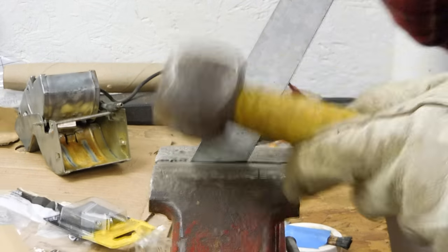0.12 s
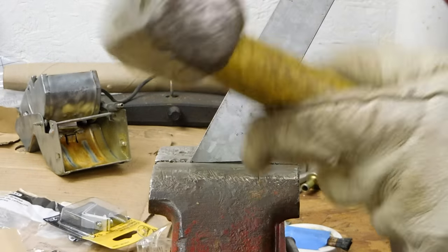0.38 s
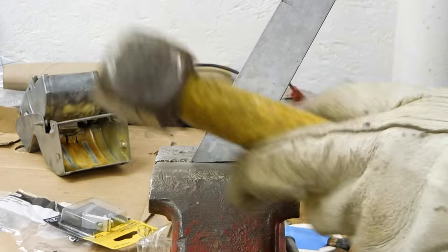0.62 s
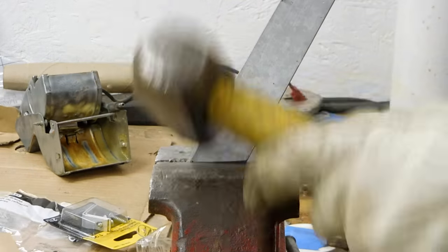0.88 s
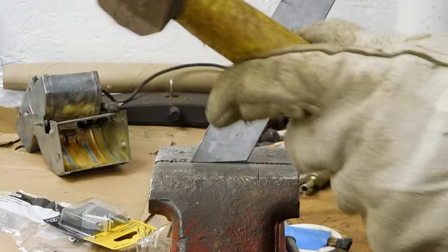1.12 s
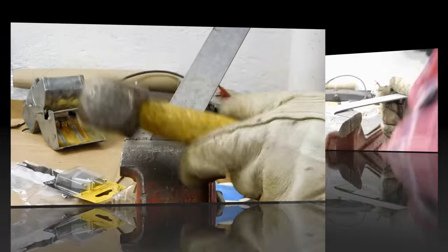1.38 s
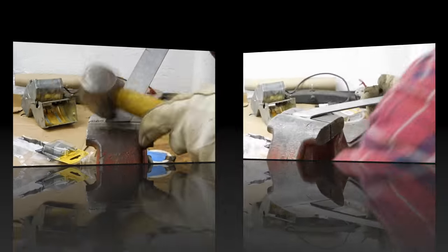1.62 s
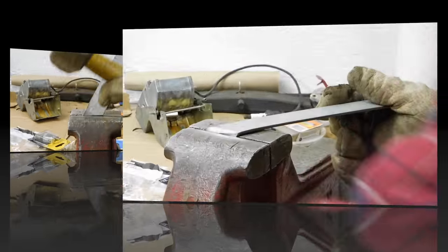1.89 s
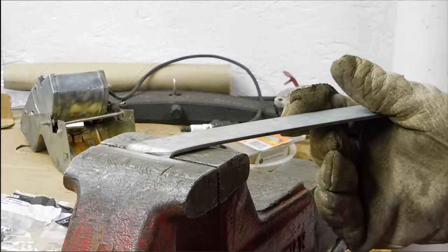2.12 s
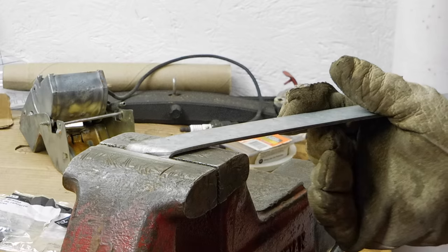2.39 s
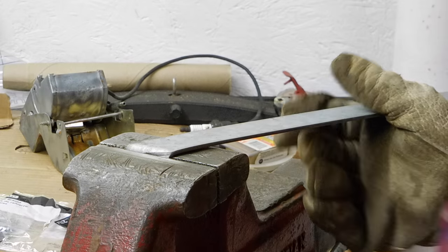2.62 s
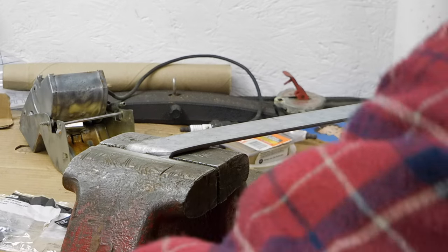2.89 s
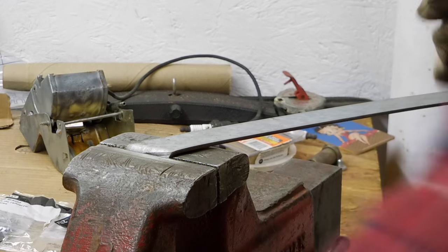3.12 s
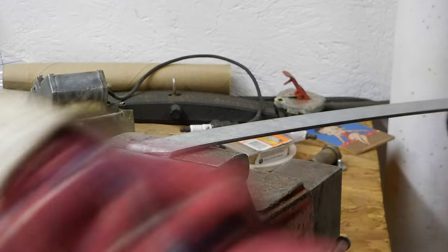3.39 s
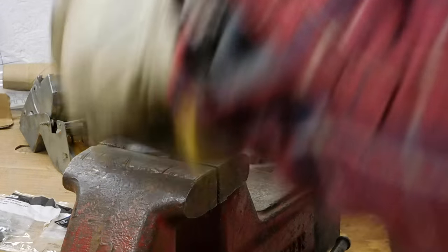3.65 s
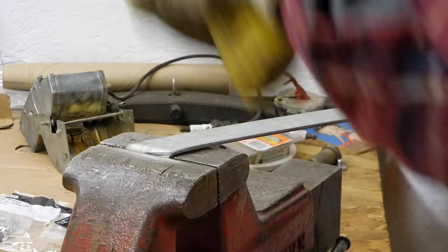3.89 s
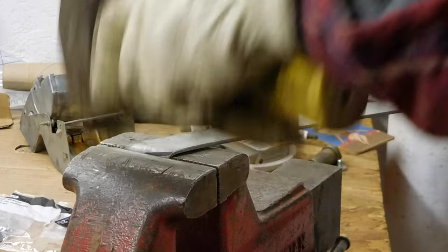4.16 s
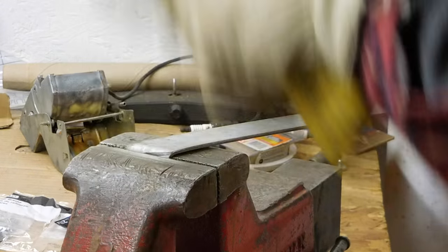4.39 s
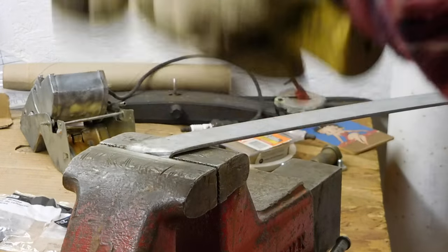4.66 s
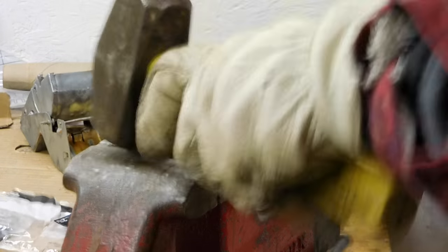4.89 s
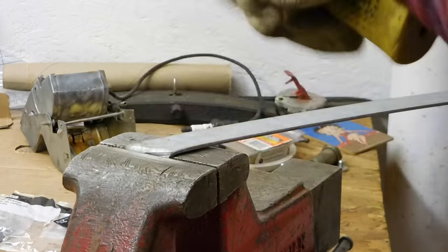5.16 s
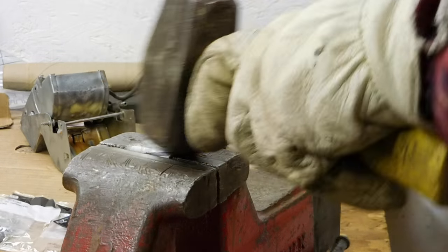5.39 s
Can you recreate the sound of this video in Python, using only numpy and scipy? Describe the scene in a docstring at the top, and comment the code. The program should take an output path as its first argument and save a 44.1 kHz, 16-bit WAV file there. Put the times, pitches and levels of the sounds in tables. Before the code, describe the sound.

In a small, hard-walled workshop, close to the microphone, a heavy hammer strikes a steel bar clamped in a vise. The tail of an earlier blow is still sounding at the start; full blows land near 0.12, 0.52, 0.9 (lighter) and 1.28 s, some with quick bounces. Each is a harsh, noisy crash with beating metallic ring, a low bench thump and rattling clutter, flattened by overload and gone within about a third of a second. From 1.35 s the hammering fades, with blows at 1.66 and 2.05 s sinking away. A faint thin hiss runs 1.7-2.4 s, with a tiny double metal clack at 2.4 s. Quiet air, small knocks and soft glove and sleeve rustles follow, strongest near 2.9 s. At 4.0 s hammering cuts in abruptly at full loudness, then again at 4.46, 4.89 and 5.32 s, with bright ringing and light rebounds about 0.1 s after the later blows.

```python
"""A club hammer strikes a flat steel bar clamped in a bench vise, in a small hard workshop; two shots, joined by a fade.
Each blow rings hammer and bar as beating modes, and crashes through vise and bench as noise dying band by band.
It thumps the bench at one low note, rattles loose clutter with random ticks and overloads the recorder's input.
Noise bands make the rustle of gloves and sleeves, the still air, small knocks and, early on, the low bench note
still sounding from the blow before; a tiny clack and a thin hiss join in.
"""
import sys
import numpy as np
from scipy import signal
from scipy.io import wavfile

SR = 44100
rng = np.random.default_rng(int(sys.argv[2]) if len(sys.argv) > 2 else 0)


def wrap_up_sound(samples):
    """Save the sound to the file named by the first command line argument, as 16-bit audio."""
    columns = np.atleast_2d(samples).T
    # keep every value between -1 and 1, then stretch to whole-number steps
    tamed = np.clip(columns, -1, 1)
    steps = np.round(tamed * 32767).astype(np.int16)
    wavfile.write(sys.argv[1], SR, steps)


def gain_from_decibels(decibels):
    """Convert decibel values to linear amplitude factors."""
    exponent = np.asarray(decibels, float) / 20
    return 10 ** exponent


N = 243431

# Full blows of the hammer. Each row: start in seconds, strength in dB, bar clank in dB against the strength,
# hammer ring in dB against the strength, crash brightness in dB per octave.
BLOWS = [(-.27, 13.5, -8.5, -5, 2.1), (.122, 14, -14.5, -10.5, 1.5), (0.5151, 14, -13, -9, 3),
         (0.899, 9, -4, -12.5, 1.6), (1.281, 14.5, -11.5, -6, 2.3), (1.659, 15, -16.5, -10, 3.5),
         (2.045, 3, -17.5, -17, 4.5), (3.9991, 14, -3, -17, 1), (4.461, 19, -10, -11, 3.5),
         (4.8917, 20, -5.5, -13.5, 2.2), (5.315, 18, -11.5, -8.5, 4.5)]
# The head bounces and touches again. Each row: start in seconds, strength in dB, bar clank in dB against the
# strength, hammer ring in dB against the strength, low ring in dB against the hammer ring.
REBOUNDS = [(0.154, 0.5, -6, -0.5, 5.5), (0.236, -20, -8, -14.5, -5.5), (0.547, 2, -5, -4, 0),
            (0.958, -7, -0.5, 0.5, -2.5), (4.006, 5, -2.5, 7, -4.5), (4.082, -8.5, -0.5, 1.5, -0.5),
            (4.59, -5.5, 2.4, 2.5, -0.5), (5.02, -6.5, 0.5, -3.5, 4.5), (5.42, -4, 1, -0.9, 4.5)]
# A rebound's crash is dull when it is hard, bright when it is light: dB per octave at strength 0, loss per dB.
REBOUND_BRIGHTNESS_DB, REBOUND_DULLING_PER_DB = 0, 0.2783
BAR_LAID_FLAT_S = 3  # the bar stands upright before, lies flat after

# Modes of the steel: the clamped bar clanks below 2.6 kHz, the hammer head rings above.
# Each entry: frequency in Hz.
STEEL_MODES_HZ = [1150, 1850, 2110, 2270, 3012, 3340, 4419, 5834, 6353, 6513, 7360, 7950, 8254, 9416, 9532,
                  9830, 10167, 10941, 11867, 13665]
# How those modes sound, in the same order. Each row: relative level in dB with the bar upright, relative level
# in dB with the bar flat, t60 in seconds, line width in Hz.
STEEL_MODES = [(-3, -1, 0.094, 320), (-0.5, -4, 0.19, 170), (-4, -4, 0.26, 172), (-12.5, -10.5, 0.32, 190),
               (0, -2, 0.19, 56), (-7, -5, 0.28, 800), (-8, -22, 0.23, 31), (-4.5, -6, 0.28, 93),
               (5, -17, 0.084, 68), (-10.5, -4, 0.15, 82), (-3, -12, 0.2, 125), (-21, -37.5, 0.45, 27),
               (-7, -30, 0.19, 34), (2, 5.5, 0.24, 49.4), (-3, -8.5, 0.28, 35), (-18.5, -8, 0.3, 97),
               (2, -11.5, 0.14, 64), (-9, -25.5, 0.27, 176), (-10.5, -20.5, 0.13, 70), (-26, -11, 0.23, 47)]
LENGTHWISE_HZ = (5834, 13665)  # The steel's lengthwise modes. Each entry: frequency in Hz.
# Against the hammer ring, for a full blow on the upright or the flat bar, and for a rebound.
LOW_RING_UPRIGHT_DB, LOW_RING_FLAT_DB = -9.5, 3
LENGTHWISE_UPRIGHT_DB, LENGTHWISE_FLAT_DB, LENGTHWISE_REBOUND_DB = -3.5, 11.5, 4

# Colour of the crash through vise and bench. Each row: frequency in Hz, relative density in dB per Hz.
CRASH_COLOUR = [(22, -12), (45, 1.5), (100, -9), (225, -16.5), (320, -1), (1200, -3.5), (2110, -7),
                (4570, -9), (5960, -6.5), (9710, -4.5), (12900, -13.5), (15500, -19)]
# How long the crash lasts. Each row: frequency in Hz, t60 in seconds.
CRASH_T60 = [(100, 0.31), (500, 0.3), (2500, 0.32), (7000, 0.26), (15000, 0.2)]

BENCH_HZ, BENCH_T60_S, BENCH_SWELL_T60_S = 66.7, 0.21, 0.091
# A blow that clanks the bar pushes the bench less.
BENCH_DB, BENCH_LOSS_PER_CLANK_DB = -26, 1.105

# Loose things on the bench settle after a blow; the level is against the blow, before reflections.
CLUTTER_DB, CLUTTER_T60_S, CLUTTER_PER_S = -38, 0.73, 300
CLUTTER_LOW_HZ, CLUTTER_HIGH_HZ = 282, 2285

ROOM_T60_S, ROOM_DB = 0.23, -4.5
CEILING_DB = -5.5  # where the input flattens the hammering, ahead of the fade
# Fade on the hammering: the first shot dies away, the second cuts in. Each row: time in seconds, gain in dB.
FADE = [(0, 1), (1.35, 1), (1.66, -4), (1.9, -10.5), (2.05, -25.5), (2.2, -38.5), (2.45, -40), (3.985, -43),
        (3.995, 2)]

# Small knocks, and at 0.026 s the low bench note still sounding from the blow before. Each row: start in seconds,
# level in dB (10.5 over the rms of the noise before it decays), centre in Hz, t60 in seconds.
BURSTS = [(0.017, -20.5, 1390, 0.57), (0.026, -28, 64.6, 0.24), (0.035, -26.5, 1630, 0.19),
          (0.051, -23, 590, 0.48), (0.049, -13, 5930, .06), (0.055, 4, 9430, 0.009),
          (0.063, -15.5, 1930, 0.14), (.37, -26.5, 599, 0.33), (0.797, -20.5, 1260, 0.23),
          (1.521, -22.5, 5500, 0.24), (1.963, -33, 7070, 0.061), (2.395, -28.5, 6000, .04),
          (2.797, -32, 3500, 0.02), (2.921, -30, 1300, 0.062), (3.263, -23.5, 554, .1),
          (3.28, -29.5, 510, .22), (3.638, -35.5, 4940, 0.048), (3.924, -23.5, 5800, 0.016),
          (4.27, -29.5, 630, 0.56), (4.77, -23, 1400, 0.19), (5.229, -26.5, 1270, 0.12),
          (5.259, -27.5, 1170, 0.2)]
BURST_TAIL_DB, BURST_TAIL_T60_S = -15, 0.2  # each burst lingers faintly in the room
# A small piece of metal, tapped twice. Each row: mode in Hz, level in dB before reflections, t60 in seconds.
CLACK_MODES = [(1950, -42, .04), (2900, -40.5, .03), (3440, -41.5, 0.036)]
# When it is tapped. Each entry: time in seconds.
CLACK_TAPS = (2.395, 2.405)

# Rubs of glove and sleeve. Each row: time at full level in seconds, hold in seconds, level of the upper rustle
# in dB, lower rustle in dB against it.
RUBS = [(2.208, 0.039, -49, -9.5), (2.42, .005, -45.5, -0.5), (2.596, .015, -53.5, -7),
        (2.72, 0.058, -52, -7), (2.888, 0.057, -33.5, -9), (3.02, 0.0028, -39, -10.5),
        (3.281, .02, -40, -8), (3.338, .18, -45.5, -8), (3.645, 0.011, -43, -8.5),
        (3.802, 0.033, -52.5, -18)]
RUB_RISE_DB_PER_S, RUB_FALL_DB_PER_S = 289, 247
# Colour of the rustle within each half. Each row: frequency in Hz, relative density in dB per Hz.
CLOTH_COLOUR = [(240, -46.5), (400, -10.5), (914, -9), (1020, -6), (1450, -6.5), (3410, -5.5), (5820, -3.5),
                (10100, 2.5), (15500, -15)]

THIN_HISS_FROM_S, THIN_HISS_TO_S = 1.7, 2.4
THIN_HISS_HZ, THIN_HISS_WIDTH_HZ, THIN_HISS_DB = 9750, 700, -56

# Colour of the still air. Each row: frequency in Hz, relative density in dB per Hz.
AIR_COLOUR = [(12, -32), (20, -11.5), (41, 8), (149, -4), (713, -1), (1080, -1), (1250, 0.5), (2720, -2.5),
              (6290, -2.5), (9830, -1.5), (15800, -8.5)]
AIR_DB = -53
# Stereo image of the noises. Each row: frequency in Hz, left-right likeness from 0 to 1.
LIKENESS = [(50, 1), (125, 0.94), (250, 1), (500, 0.87), (1000, 0.9), (2000, 0.25), (8000, 0.25),
            (14000, 0.21)]


def rms_one(x):
    """Scales a sound to an rms of 1."""
    return x / np.sqrt(np.mean(x ** 2) + 1e-20)


def at_hz(points, hz):
    """Reads a curve over frequency, straight between its points on a log axis."""
    points = np.array(points)
    return np.interp(np.log(hz), np.log(points[:, 0]), points[:, 1])


def clicks(times, sizes):
    """Single-sample impulses that excite everything struck."""
    out = np.full(N, 1e-18)
    np.add.at(out, (np.asarray(times) * SR).astype(int), sizes)
    return out


def dying(x, t60):
    """Every click leaves a level that falls 60 dB in t60; energies add."""
    energy_decay = gain_from_decibels(-120 / (t60 * SR))
    return np.sqrt(signal.lfilter([1], [1, -energy_decay], x ** 2 + 1e-30))


def struck(s, db, t60):
    """Dying level after contacts; those before time zero have already faded."""
    already_faded_db = 60 * s.clip(max=0) / t60
    return dying(clicks(s.clip(0), gain_from_decibels(db + already_faded_db)), t60)


def ring(x, hz, t60):
    """A resonance: a unit click sets a sine of height 1 ringing."""
    r = gain_from_decibels(-60 / (t60 * SR))
    w = 2 * np.pi * hz / SR
    return signal.lfilter([0, np.sin(w)], [1, -2 * r * np.cos(w), r * r], x)


def flutter(width_hz):
    """Four strands of slow random motion of rms 1, drawn every 64th sample; a wider line moves faster."""
    r = np.exp(-64 * np.pi * width_hz / SR)
    chance = rng.standard_normal((4, N // 64 + 402))
    slow = signal.lfilter([1], [1, -2 * r, r * r], chance)[:, 400:]  # skip the run-in
    return [np.interp(np.arange(N) / 64, np.arange(slow.shape[1]), strand) for strand in rms_one(slow)]


def noise_bands():
    """Third-octave bands of stereo noise with their centres, more alike left and right in the bass."""
    edges = 22 * 2 ** (np.arange(30) / 3)
    white = rng.standard_normal((2, 2, N))
    for k, (low, high) in enumerate(zip(edges, edges[1:])):
        band = signal.butter(2, [low, high], "band", fs=SR, output="sos")
        mid, side = signal.sosfilt(band, white[k % 2])  # neighbours use separate noise
        hz = np.sqrt(low * high)
        alike = np.clip(at_hz(LIKENESS, hz), 0, 1)
        yield hz, np.sqrt(1 + alike) * mid + np.sqrt(1 - alike) * side * [[1], [-1]]


def workshop(x):
    """Direct sound plus a dense tail of reflections, another one at each ear."""
    age = np.arange(SR // 2) / SR
    tail = rng.standard_normal((2, len(age))) * gain_from_decibels(-60 * age / ROOM_T60_S) * (age > 0.002)
    tail = tail / np.sqrt(np.sum(tail ** 2, axis=1, keepdims=True))
    return x + gain_from_decibels(ROOM_DB) * signal.fftconvolve(x[None], tail, axes=1)[:, :N]


def contacts():
    """Every touch of hammer on steel: s, strength, clank, low ring, high ring, lengthwise ring, brightness."""
    blows = [(s, strength, clank, head, LOW_RING_FLAT_DB if s > BAR_LAID_FLAT_S else LOW_RING_UPRIGHT_DB, tilt)
             for s, strength, clank, head, tilt in BLOWS]
    bounces = [(*row, REBOUND_BRIGHTNESS_DB - REBOUND_DULLING_PER_DB * row[1]) for row in REBOUNDS]
    s, strength_db, clank_db, ring_db, low_db, tilt = np.transpose(blows + bounces)
    is_blow = np.arange(len(s)) < len(BLOWS)
    blow_lengthwise_db = np.where(s > BAR_LAID_FLAT_S, LENGTHWISE_FLAT_DB, LENGTHWISE_UPRIGHT_DB)
    lengthwise_db = np.where(is_blow, blow_lengthwise_db, LENGTHWISE_REBOUND_DB)
    return s, strength_db, clank_db, ring_db + low_db, ring_db, ring_db + lengthwise_db, tilt


def steel():
    """Contacts strike every mode; the moving steel stirs its reflections, so lines beat, unlike at the two ears."""
    s, strength_db, clank_db, low_db, high_db, lengthwise_db, _ = contacts()
    scatter = rng.standard_normal((len(s), len(STEEL_MODES)))
    out = 0
    for hz, (upright_db, flat_db, t60, width_hz), chance in zip(STEEL_MODES_HZ, STEEL_MODES, scatter.T):
        if hz in LENGTHWISE_HZ:
            struck_db = lengthwise_db
        elif hz < 2600:
            struck_db = clank_db
        else:
            struck_db = low_db if hz < 5000 else high_db
        level_db = np.where(s < BAR_LAID_FLAT_S, upright_db, flat_db) + struck_db
        envelope = struck(s, strength_db + level_db + 1.2 * chance, t60)
        a, b, c, d = flutter(width_hz)
        shared = 0.17  # part of the stirring that both ears hear alike
        along = np.array([a, b]) + shared * (a + b)
        across = np.array([c, d]) + shared * (c + d)
        direct, stirred = (0.15 if hz < 2600 else 0.45), 0.63
        turn = 2 * np.pi * hz * np.arange(N) / SR
        line = (direct + stirred * along) * np.sin(turn) + stirred * across * np.cos(turn)
        out = out + envelope * line
    return out


def crash():
    """Vise and bench clatter as noise that dies band by band, each band at its own pace."""
    s, strength_db, *_, tilt = contacts()
    uneven_db = 2.0 * rng.standard_normal((30, len(s)))  # no two blows shake the same parts equally
    out = 0
    for (hz, band), chance_db in zip(noise_bands(), uneven_db):
        hit_db = strength_db + chance_db + tilt * np.log2(hz / 2000)
        envelope = struck(s, hit_db, at_hz(CRASH_T60, hz))
        out = out + 1.31 * gain_from_decibels(at_hz(CRASH_COLOUR, hz)) * envelope * band
    return out


def bench():
    """The heavy top takes a moment to move, then thumps at one low note."""
    s, strength_db, clank_db = contacts()[:3]
    push_db = BENCH_DB - BENCH_LOSS_PER_CLANK_DB * clank_db
    note = ring(clicks(s, (s > 0) * gain_from_decibels(strength_db + push_db)), BENCH_HZ, BENCH_T60_S)
    full_blow = (s > 0) & (np.arange(len(s)) < len(BLOWS))
    swell = 1 - dying(clicks(s, full_blow), BENCH_SWELL_T60_S).clip(0, 1)  # restarts at full blows only
    return note * swell


def clutter():
    """Random ticks into twelve short resonances, fading slowly after each contact."""
    s, strength_db = contacts()[:2]
    tick_sizes = gain_from_decibels(2.6 * np.minimum(rng.exponential(1, N), 4))
    ticks = tick_sizes * (rng.random(N) < CLUTTER_PER_S / SR)
    dealt = rng.integers(0, 12, N)  # which resonance each tick hits
    pitches = np.geomspace(CLUTTER_LOW_HZ, CLUTTER_HIGH_HZ, 12)
    rings = sum(ring(ticks * (dealt == k) + 1e-18, hz, 7.5 / hz) for k, hz in enumerate(pitches))
    return workshop(rms_one(rings)) * struck(s, strength_db + CLUTTER_DB, CLUTTER_T60_S)


def overload(x):
    """The input stage flattens everything above its ceiling."""
    return np.clip(x, -gain_from_decibels(CEILING_DB), gain_from_decibels(CEILING_DB))


def knocks_and_bench_note():
    """Bursts of noise around a broad centre, each with its own decay and a faint tail."""
    out = np.zeros((2, N))
    age = np.arange(int(0.4 * SR)) / SR
    for s, level_db, hz, t60 in BURSTS:
        mid, left, right = rng.standard_normal((3, len(age)))
        spread = 1.4 if hz < 800 else 1.6
        order = 2 if hz < 2600 else 1
        edges = [hz / spread, min(hz * spread, 0.45 * SR)]
        band = signal.butter(order, edges, "band", fs=SR, output="sos")
        noise = rms_one(signal.sosfilt(band, mid + 0.5 * np.array([left, right])))
        decay = gain_from_decibels(-60 * age / t60) + gain_from_decibels(BURST_TAIL_DB) * gain_from_decibels(-60 * age / BURST_TAIL_T60_S)
        burst = noise * gain_from_decibels(level_db - 10.5) * decay
        at = int(s * SR)
        out[:, at:at + len(age)] += burst[:, :N - at]
    return out


def clack():
    """Two quick taps on a small piece of metal ring three short modes."""
    return workshop(sum(ring(clicks(CLACK_TAPS, gain_from_decibels(db)), hz, t60) for hz, db, t60 in CLACK_MODES))


def rubbing():
    """Each rub swells, holds and dies away; returns the gains of the upper and the lower rustle."""
    t, upper, lower = np.arange(N) / SR, 0, 0
    for s, held_s, db, lower_db in RUBS:
        rise_db = RUB_RISE_DB_PER_S * (s - t).clip(0)
        fall_db = RUB_FALL_DB_PER_S * (t - s - held_s).clip(0)
        gain = gain_from_decibels(db - rise_db - fall_db)
        upper, lower = np.maximum(upper, gain), np.maximum(lower, gain * gain_from_decibels(lower_db))
    return upper, lower


def cloth():
    """Gloves and sleeves rub: coloured noise, its halves above and below 4.5 kHz swelling with each rub."""
    upper, lower = rubbing()
    high, low = 0, 0
    for hz, band in noise_bands():
        rustle = gain_from_decibels(at_hz(CLOTH_COLOUR, hz)) * band
        if hz > 4500:
            high = high + rustle
        else:
            low = low + rustle
    return upper * rms_one(high) + lower * rms_one(low)


def thin_hiss():
    """Narrow treble noise that fades in over 30 ms and out over 30 ms."""
    t, half = np.arange(N) / SR, THIN_HISS_WIDTH_HZ / 2
    band = signal.butter(2, [THIN_HISS_HZ - half, THIN_HISS_HZ + half], "band", fs=SR, output="sos")
    gate = (np.minimum(t - THIN_HISS_FROM_S, THIN_HISS_TO_S - t) / 0.03).clip(0, 1)
    return gain_from_decibels(THIN_HISS_DB) * gate * rms_one(signal.sosfilt(band, rng.standard_normal((2, N))))


def still_air():
    """The still air of the room: steady coloured noise."""
    air = sum(gain_from_decibels(at_hz(AIR_COLOUR, hz)) * band for hz, band in noise_bands())
    return gain_from_decibels(AIR_DB) * rms_one(air)


def scene():
    """The overloaded hammering follows the fade; the other sounds lie outside it."""
    hammering = overload(steel() + crash() + bench() + clutter())
    fade_s, fade_db = np.transpose(FADE)
    fade = gain_from_decibels(np.interp(np.arange(N) / SR, fade_s, fade_db))
    return hammering * fade + knocks_and_bench_note() + clack() + cloth() + thin_hiss() + still_air()


def roll_off(x):
    """The treble ends steeply here."""
    return signal.sosfilt(signal.butter(12, 15980, fs=SR, output="sos"), x)


def record(dry):
    """The top is cut, the overshoot clips at full scale."""
    top_cut = signal.cheby2(12, 45, 16250, fs=SR, output="sos")  # 45 dB down from 16.25 kHz up
    finished = np.clip(signal.sosfilt(top_cut, dry), -1, 1)
    return roll_off(finished)


dry = scene()
out = record(dry)
wrap_up_sound(out)
```